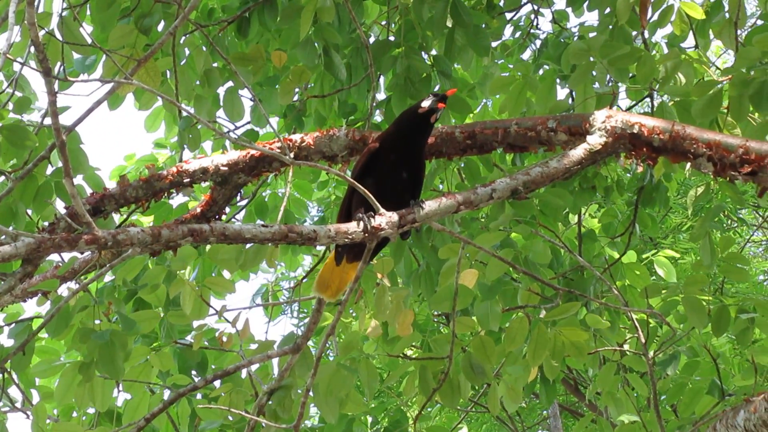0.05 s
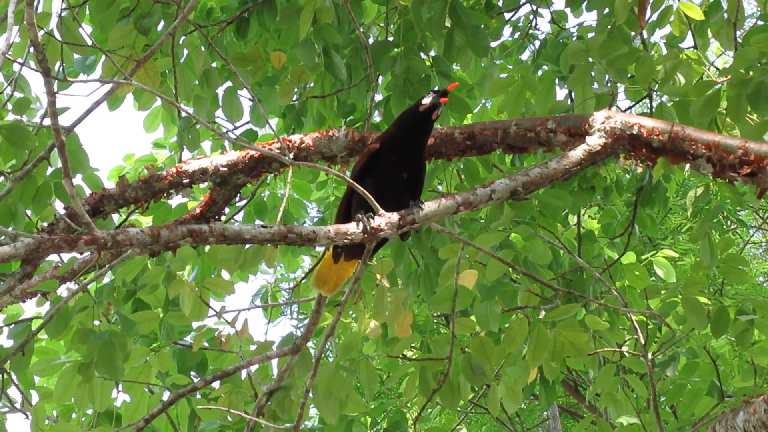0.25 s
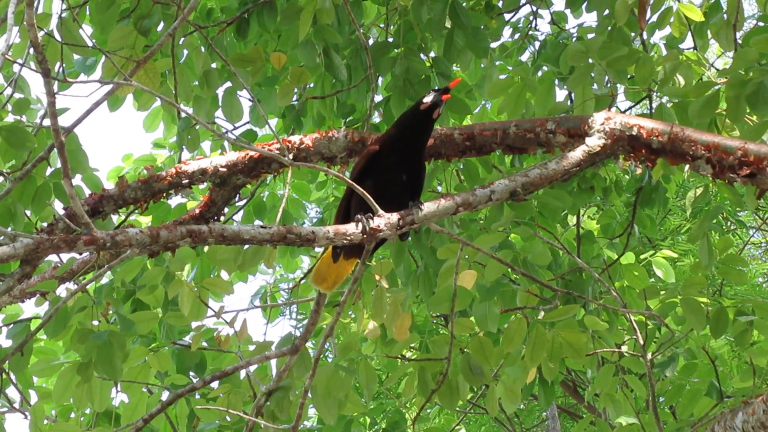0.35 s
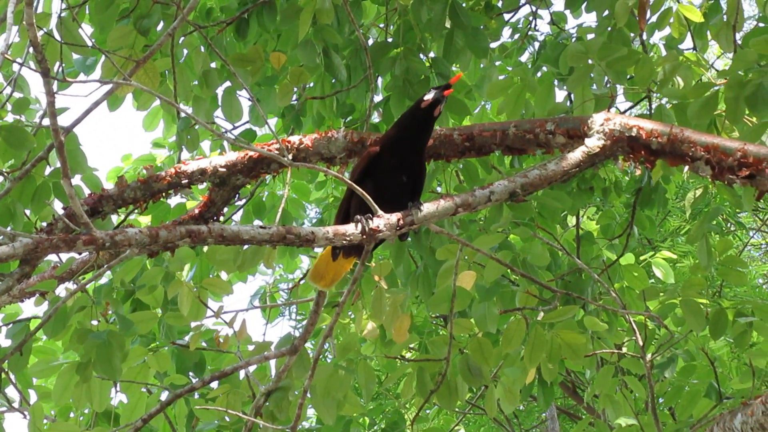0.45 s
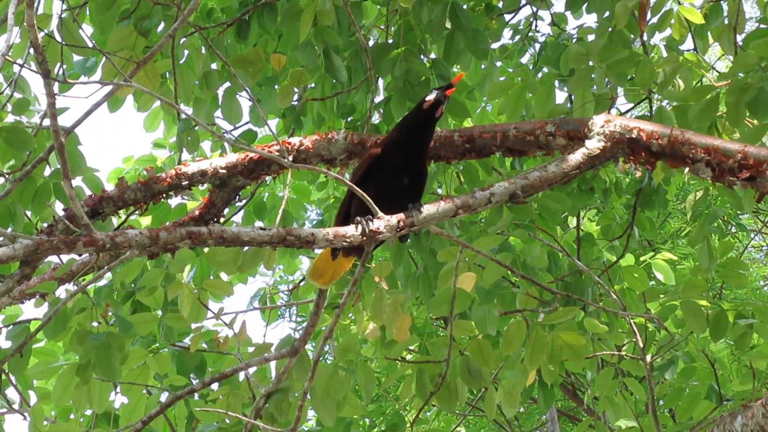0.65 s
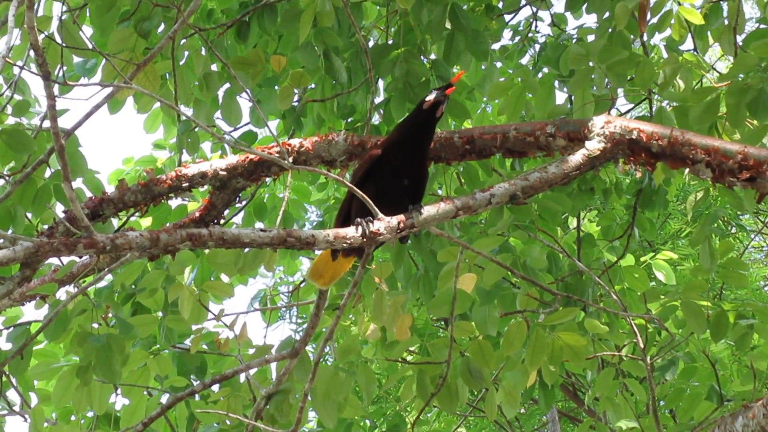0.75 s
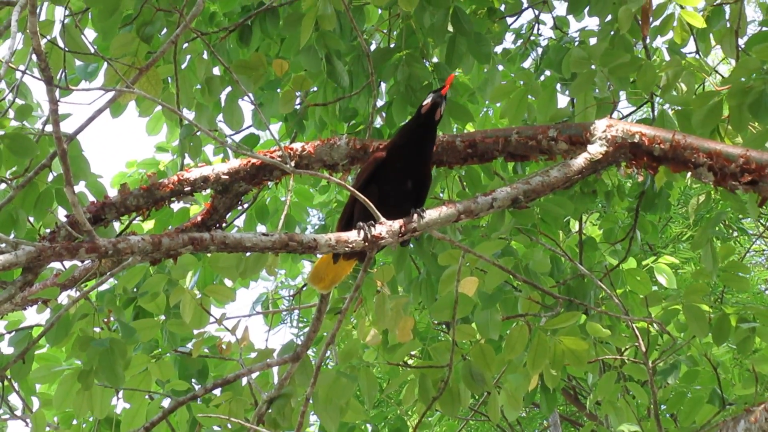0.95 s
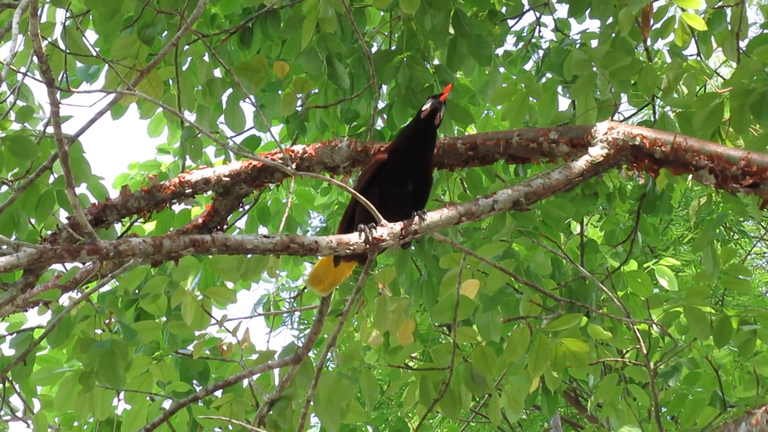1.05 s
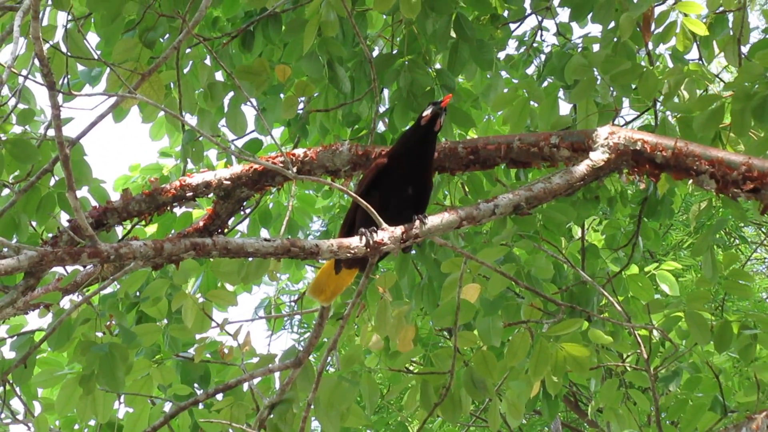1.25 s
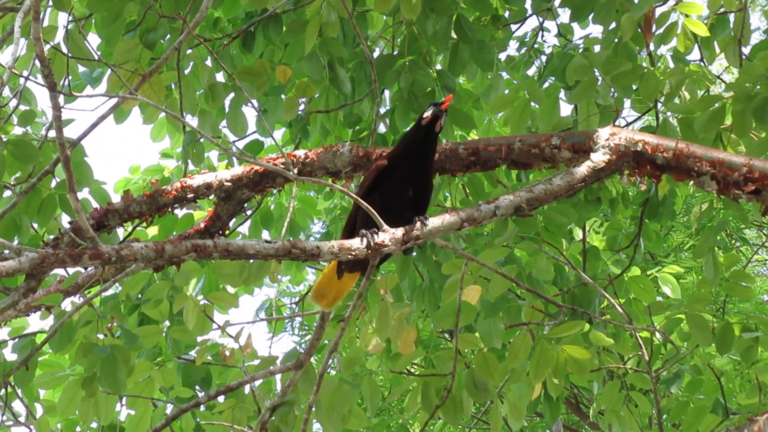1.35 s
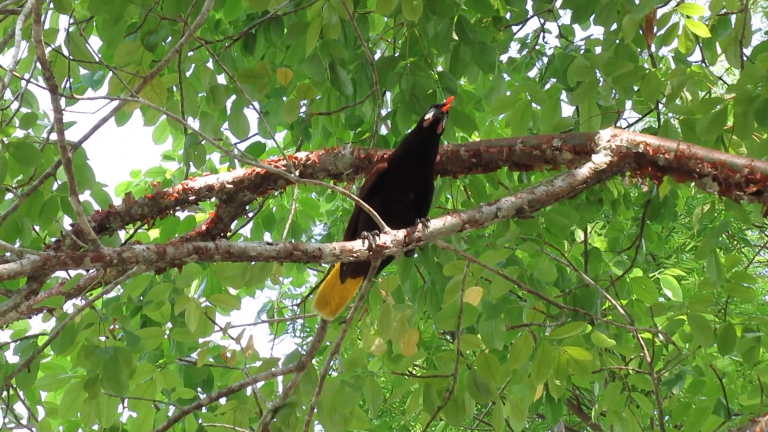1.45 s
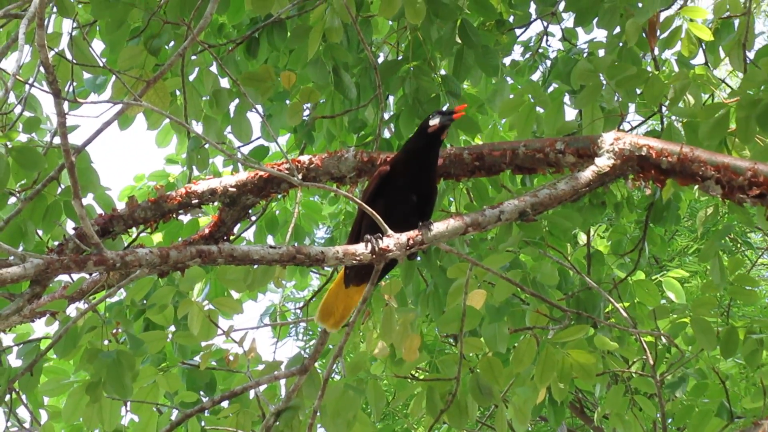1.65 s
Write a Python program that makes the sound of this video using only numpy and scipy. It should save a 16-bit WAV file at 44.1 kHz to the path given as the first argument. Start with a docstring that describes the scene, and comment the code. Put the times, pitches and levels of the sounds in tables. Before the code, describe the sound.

One bird's rapid, liquid call starts softly with chirps and squeaks, grows loud and piercing, then breaks into raspy, watery low notes among trees, with short woodland echoes and very quiet background air in mono.

```python
"""In a forest, an oropendola gives one gurgling call that swells and ends in low, liquid notes.
One side of its syrinx flips between thin whistles, overtone-rich squeals and rasps; the other hoots below.
Both are harmonic oscillators with trembling pitch; the rasps mix an erratic tone with coloured noise.
Branches, trunks, leaves and canopy reflect the call over faint forest air and a far hum."""
import sys
import numpy as np
from scipy import signal
from scipy.fft import rfft, irfft
from scipy.io import wavfile
from scipy.ndimage import uniform_filter1d

SR = 44100
rng = np.random.default_rng(int(sys.argv[2]) if len(sys.argv) > 2 else 0)


def wrap_up_sound(samples):
    """Save the sound to the file named by the first command line argument, as 16-bit audio."""
    columns = np.atleast_2d(samples).T
    # keep every value between -1 and 1, then stretch to whole-number steps
    tamed = np.clip(columns, -1, 1)
    steps = np.round(tamed * 32767).astype(np.int16)
    wavfile.write(sys.argv[1], SR, steps)


N = 74970
T = np.arange(N) / SR

# the throat's relative weighting of overtones: f/Hz, gain/dB
THROAT = [(1000, 0.5), (1900, -4), (2400, -0.5), (2850, 3.5), (3300, -4.5), (3900, -1), (4500, 1.5),
          (5000, 0), (5500, -2.5), (6300, -3.5), (7200, 1), (8500, -8.5), (10000, -12), (12000, -21),
          (15000, -29)]
HOOT_FADE_S = 0.0046  # fades of the low voice
BRANCH_DELAY_S = 0.0096  # the nearest branch's echo; the trunks answer later


def undb(db):
    """Level definition: an amplitude ratio is 10 to the power of dB/20."""
    return 10 ** (np.asarray(db) / 20)


def walk(rate_hz):
    """Band-limited random modulation: held random values, smoothed twice, with a spread near 1."""
    hold = max(2, int(SR / rate_hz))
    steps = rng.standard_normal(N)[np.arange(N) // hold]
    return 1.3 * uniform_filter1d(uniform_filter1d(steps, hold), hold)


def gain_at(hz, points):
    """Frequency response: gain of a (f/Hz, dB) curve, interpolated along log frequency."""
    f, db = np.array(points).T
    return undb(np.interp(np.log(np.maximum(hz, 1)), np.log(f), db))


def colour(x, points):
    """Linear filtering: the spectrum is multiplied by a (f/Hz, dB) curve."""
    return irfft(rfft(x) * gain_at(np.fft.rfftfreq(N, 1 / SR), points), N)


def noise(points):
    """Spectral shaping: white noise is filtered to a given colour and scaled to rms 1."""
    y = colour(rng.standard_normal(N), points)
    return y / y.std()


def gate(start, end, attack, release):
    """Amplitude envelope: sine-squared rise and fall, centred on a note's start and end."""
    rise = np.clip((T - start) / attack + .5, 0, 1)
    fall = np.clip((end - T) / release + .5, 0, 1)
    return np.sin(np.pi / 2 * rise * fall) ** 2


def glide(rows):
    """Continuous glide: a note's columns are interpolated in time and their corners rounded."""
    s, *columns = np.array(rows, float).T
    return [uniform_filter1d(np.interp(T, np.sort(s), c), size=110) for c in columns]


def background():
    """Broadband and tonal ambience: soft, wavering forest air and a faint far hum of unsteady pitch."""
    # forest air: f/Hz, relative spectral density/dB per Hz
    air_colour = [(25, -58), (42, -1.5), (75, -5.5), (160, -6.5), (330, -6.5), (600, -3.5), (1000, -8.5),
                  (1500, -11), (5000, -18.5), (10000, -22), (15000, -29)]
    air_db, hum_hz, hum_db = -58.5, 112, -70
    hum = np.sin(2 * np.pi * np.cumsum(hum_hz * (1 + 0.026 * walk(8.5))) / SR)
    air = undb(air_db) * noise(air_colour) * undb(0.58 * walk(4.8))
    return air + undb(hum_db) * hum


def syrinx(hz, fundamental, overtones, throat, jitter, flutter_db, count=12):
    """Harmonic series: a membrane of trembling pitch, its fluttering overtones weighted by the throat."""
    hz = hz * (1 + jitter * walk(700))
    on = fundamental > 0
    phase = 2 * np.pi * np.cumsum(hz[on]) / SR
    out = np.zeros(N)
    out[on] = fundamental[on] * np.sin(phase)
    multiples = np.arange(2, count + 1)[:, None]
    weights = gain_at(multiples * hz[on], throat) * (multiples * hz[on] < SR / 2)
    weights /= weights.max(axis=0) + 1e-9  # the strongest overtone gets weight 1
    for k, weight in zip(multiples, weights):
        flutter = undb(flutter_db * walk(69.19)[on])
        out[on] += overtones[on] * weight * flutter * np.sin(k * phase)
    return out


def high_notes(notes, level_db, jitter, swing):
    """Frequency modulation: the low voice's swing puts sidebands on high notes, rougher in fast glides."""
    attack_s, release_s, overtone_db = 0.0035, 0.0045, -2
    coupling = .065  # share by which the low voice swings the pitch
    glide_jitter, fast_glide_octaves_per_s = .017, 22  # extra pitch tremble in fast glides
    out = np.zeros(N)
    for note in notes:
        hz, low_db, high_db = glide(note)
        octaves_per_s = np.abs(np.gradient(np.log2(hz))) * SR
        unrest = np.minimum(octaves_per_s / fast_glide_octaves_per_s, 1)
        envelope = gate(note[0][0], note[-1][0], attack_s, release_s) * undb(level_db)
        fundamental = envelope * undb(low_db)
        overtones = envelope * undb(high_db + overtone_db)
        out += syrinx(hz * (1 + coupling * swing), fundamental, overtones,
                      THROAT, jitter + glide_jitter * unrest, flutter_db=2.5)
    return out


def whistles(swing):
    """Near-sinusoidal oscillation: thin, high notes, mostly dominated by the fundamental."""
    # one list per whistle: t/s, pitch f/Hz, fundamental and strongest overtone/dB before the offsets
    whistle_notes = [
        [(0.0, 5370, -39.5, -64), (0.01, 5350, -57, -62), (0.022, 5070, -40, -70)],
        [(0.073, 3000, -65, -60), (0.097, 3450, -57, -53.5), (0.11, 3276, -51, -51), (0.122, 3775, -60, -48),
         (0.15, 3375, -48, -46.5)],
        [(0.206, 4300, -51, -53), (0.225, 4996, -42, -57), (0.245, 5230, -43, -75)],
        [(0.333, 5370, -37, -71), (0.34, 6950, -48, -55), (0.353, 6400, -46, -57), (0.364, 6800, -42.5, -58),
         (0.372, 5930, -45, -62), (0.377, 2900, -68, -53)],
        [(0.429, 5480, -48, -69), (0.437, 6900, -38, -73), (0.446, 7400, -38, -62), (0.455, 7250, -39.5, -58),
         (0.469, 7200, -36.5, -54)],
        [(0.618, 5690, -44, -66), (0.63, 6760, -34.5, -54), (0.642, 6930, -35, -52), (0.652, 7480, -34, -77)],
        [(0.812, 3970, -35, -50), (0.822, 3960, -36, -38), (0.834, 4100, -30.5, -37)],
    ]
    return high_notes(whistle_notes, level_db=2, jitter=.016, swing=swing)


def squeals(swing):
    """Harmonic-rich oscillation: overtones that often exceed the gliding fundamental."""
    # one list per squeal: t/s, pitch f/Hz, fundamental and strongest overtone/dB before the offsets
    squeal_notes = [
        [(0.026, 1053, -61, -55.5), (0.04, 1278, -45, -51.5), (0.058, 1368, -57, -45.5),
         (0.072, 1502, -61, -47)],
        [(0.152, 3350, -55, -78), (0.163, 973, -46.5, -47), (0.172, 834, -45.5, -65), (0.187, 1009, -61, -49.5),
         (0.204, 1035, -65, -45.5)],
        [(0.246, 3836, -37.5, -58), (0.249, 1587, -47.5, -57), (0.268, 1447, -41.5, -41),
         (0.298, 1334, -65, -46), (0.315, 1417, -72, -45.5), (0.336, 1353, -67, -53)],
        [(0.378, 946, -51, -47.5), (0.39, 1165, -59, -42), (0.401, 1181, -47.5, -42.5),
         (0.415, 1136, -64, -51.5), (0.426, 1170, -72, -48)],
        [(0.472, 1088, -46.5, -42.5), (0.482, 1442, -32.5, -41.5), (0.495, 1762, -43, -39.5),
         (0.507, 1934, -42.5, -33.5), (0.535, 1944, -48.5, -34.5), (0.55, 1694, -58, -46),
         (0.566, 1690, -40.5, -41)],
        [(0.568, 2028, -56, -40), (0.585, 2154, -49, -36.5), (0.6, 1960, -50.5, -34.5), (0.617, 1937, -49, -32)],
        [(0.653, 4010, -43, -38), (0.657, 1445, -41.5, -34), (0.67, 1705, -34.5, -44.5),
         (0.686, 1826, -33.5, -38), (0.705, 1986, -48, -33.5), (0.722, 2455, -40.5, -35.5),
         (0.738, 2620, -37, -32), (0.762, 2405, -42, -38.5), (0.791, 2314, -42, -28.5)],
        [(0.835, 3770, -42, -41), (0.841, 2622, -22, -32), (0.855, 2425, -27, -27.5), (0.868, 2222, -35.5, -31),
         (0.885, 2297, -39, -30.5), (0.897, 1903, -36, -31.5), (0.915, 1581, -32.5, -35.5),
         (0.942, 1465, -50, -42), (0.953, 730, -37.5, -33.5)],
        [(0.957, 2083, -46, -34.5), (0.975, 2224, -48, -35.5), (0.99, 2204, -47.5, -34),
         (1.013, 2110, -46, -48)],
        [(1.04, 1920, -45, -40), (1.05, 1720, -43, -36.5), (1.065, 1592, -44.5, -38), (1.085, 1574, -65, -36)],
        [(1.095, 2700, -52, -49), (1.115, 2680, -53, -62), (1.145, 2580, -50, -69)],
        [(1.18, 1808, -53, -44.5), (1.195, 1707, -54, -44.5), (1.21, 1519, -55, -50),
         (1.232, 1480, -51.5, -44.5)],
        [(1.265, 1583, -61, -38), (1.274, 1328, -72, -49.5), (1.283, 1027, -41, -52)],
    ]
    return high_notes(squeal_notes, level_db=-0.5, jitter=.004, swing=swing)


def high_voice(swing):
    """Amplitude modulation: whistles and squeals share an irregular, rapid change of strength."""
    buzz_rate_hz, buzz_depth = 900, 0.19  # new random strengths per second, relative spread
    buzz = 1 + buzz_depth * walk(buzz_rate_hz)
    return (squeals(swing) + whistles(swing)) * buzz


def scatter(t60, db):
    """Diffuse reverberation: a cloud of reflections, coloured noise decaying by 60 dB in t60 seconds."""
    # leaves scatter the treble more than the bass: f/Hz, relative gain/dB
    scatter_colour = [(700, -4), (2500, -2), (6000, 3.5), (12000, 1)]
    decay = np.exp(-np.log(1000) * T / t60)
    tail = noise(scatter_colour) * decay * np.clip(T / 0.0069, 0, 1)
    return undb(db) * tail / np.linalg.norm(tail)


def trunks(count=12):
    """Discrete reflections: trunks at random distances echo more weakly the later they answer."""
    span_s, t60_s, level_db = .14, .4, -9.5
    delays = BRANCH_DELAY_S + span_s * (np.arange(count) + rng.random(count)) / count
    response = np.zeros(N)
    response[(delays * SR).astype(int)] = np.exp(-np.log(1000) * delays / t60_s)
    return undb(level_db) * response / np.linalg.norm(response)


def trees(call):
    """Superposed reflections: branch and trunk echoes, short leaf scatter and longer canopy scatter."""
    # frequency response of the branch's echo: f/Hz, relative gain/dB
    branch_colour = [(900, 2), (2200, 9), (5000, -7.5), (12000, 0)]
    branch_db = -9
    delayed = np.interp(T - BRANCH_DELAY_S, T, colour(call, branch_colour), left=0)
    leaves = scatter(t60=0.21, db=-7.5)
    canopy = scatter(t60=0.42, db=-11)
    reflected = signal.fftconvolve(call, trunks() + leaves + canopy)[:N]
    return call + undb(branch_db) * delayed + reflected


def hoots():
    """Two-source phonation: short low notes on parabolic pitch paths, returned with the membrane's swing."""
    # short low notes: start t/s, length t/s, start, middle and end f/Hz, fundamental level/dB
    hoot_notes = [(0.076, 0.033, 620, 768, 710, -53), (0.207, 0.029, 668, 611, 570, -54),
                  (0.288, 0.025, 630, 714, 716, -45), (0.42, 0.045, 524, 545, 498, -60),
                  (0.514, 0.034, 570, 671, 585, -46.5), (0.566, 0.018, 770, 809, 883, -36),
                  (0.702, 0.019, 553, 538, 560, -51.5), (0.743, 0.0179, 868, 808, 798, -36.5),
                  (0.793, 0.023, 622, 545, 623, -43), (0.949, 0.018, 841, 657, 593, -40.5),
                  (1.009, 0.025, 604, 683, 583, -42.5)]
    overtone_db = -16  # strongest overtone relative to the fundamental
    out, swing = np.zeros(N), np.zeros(N)
    for start, length, first, middle, last, db in hoot_notes:
        arch = np.polyfit([0, .5, 1], [first, middle, last], 2)
        hz = np.polyval(arch, np.clip((T - start) / length, 0, 1))
        envelope = gate(start, start + length, HOOT_FADE_S, HOOT_FADE_S)
        out += syrinx(hz, envelope * undb(db), envelope * undb(db + overtone_db),
                      THROAT, jitter=0.0046, flutter_db=1)
        swing += envelope * np.sin(2 * np.pi * np.cumsum(hz) / SR)
    return out, swing


def rasps(flutter_db):
    """Irregular vibration: the membrane's pitch skitters widely amid air noise, and both flutter."""
    # rasps: start t/s, length t/s, centre f/Hz, reference level/dB for tone and air
    rasp_notes = [(0.164, 0.048, 5150, -49.5), (.245, 0.026, 5600, -48), (0.367, 0.011, 5750, -49),
                  (0.413, 0.021, 5600, -45), (0.542, 0.11, 5240, -42.5), (0.613, 0.028, 5700, -60),
                  (0.785, 0.039, 5580, -36), (0.907, 0.072, 5350, -42), (1.006, 0.044, 5950, -38.5),
                  (1.057, 0.14, 5480, -47.5), (1.181, 0.1, 5230, -48.5), (1.285, .15, 5290, -58)]
    # colour of a rasp's air: multiple of its centre f, relative spectral density/dB per Hz
    rasp_shape = [(.12, -15.5), (.25, -15), (.38, -13), (.53, -3), (.68, -8.5), (.9, -1), (1.2, 0),
                  (1.6, -7), (2.2, -15.5), (3, -25)]
    fade_s, pitch_jitter, tone_db, air_db = 0.011, .14, -5, -2
    out = np.zeros(N)
    for start, length, hz, db in rasp_notes:
        pitch = hz * np.exp(pitch_jitter * walk(450))
        skitter = np.sqrt(2) * np.sin(2 * np.pi * np.cumsum(pitch) / SR)  # rms 1
        air = noise([(hz * k, d) for k, d in rasp_shape])
        envelope = undb(db) * gate(start, start + length, fade_s, fade_s)
        out += envelope * (undb(tone_db) * skitter + undb(air_db) * air)
    return out * undb(flutter_db * walk(350))


def gurgle():
    """Continuous frequency glide: the low voice swoops up and down, with faint overtones."""
    # the closing gurgle: t/s, pitch f/Hz, fundamental level/dB
    gurgle_notes = [(1.083, 591.7, -42), (1.094, 804.5, -31.5), (1.104, 901, -27.5), (1.128, 897.4, -31),
                    (1.147, 1199, -61.5), (1.158, 841.4, -30.5), (1.178, 620.5, -40.5), (1.205, 596.6, -70),
                    (1.234, 1048, -47.5), (1.244, 798, -30.5), (1.257, 721.6, -37.5), (1.273, 1049, -56),
                    (1.287, 890, -32.5), (1.303, 854.4, -35), (1.338, 662, -39.5), (1.364, 765.5, -36),
                    (1.392, 721, -41.5), (1.423, 859.5, -41.5), (1.443, 867, -46)]
    # the throat's relative weighting of overtones during the gurgle: f/Hz, gain/dB
    gurgle_throat = [(1500, -15.5), (2500, -3), (3300, 3), (4000, -10), (4500, -8), (5700, -3), (7000, -10),
                     (10000, -16)]
    overtone_db = -21  # strongest overtone relative to the fundamental
    hz, db = glide(gurgle_notes)
    envelope = gate(gurgle_notes[0][0], gurgle_notes[-1][0], HOOT_FADE_S, HOOT_FADE_S) * undb(db)
    return syrinx(hz, envelope, envelope * undb(overtone_db), gurgle_throat, jitter=0.0107, flutter_db=6.0)


def scene():
    """Superposition: both voices of the bird, heard through the trees over the background."""
    low, swing = hoots()
    call = high_voice(swing) + rasps(flutter_db=0.5) + low + gurgle()
    return (trees(call) + background())[None]


def record(dry):
    """Low-pass filtering: a steep elliptic filter removes the top of the treble."""
    top_hz = 15050
    low_pass = signal.ellip(10, .1, 80, top_hz, fs=SR, output="sos")  # 0.1 dB ripple, 80 dB rejection
    return signal.sosfilt(low_pass, dry)


dry = scene()
out = record(dry)
wrap_up_sound(out)
```